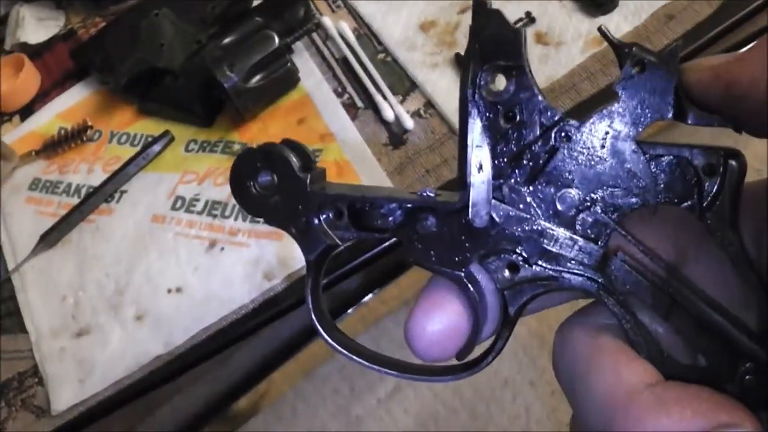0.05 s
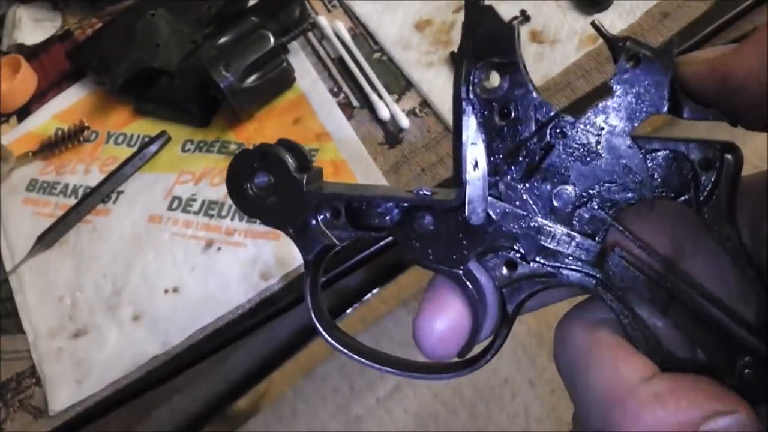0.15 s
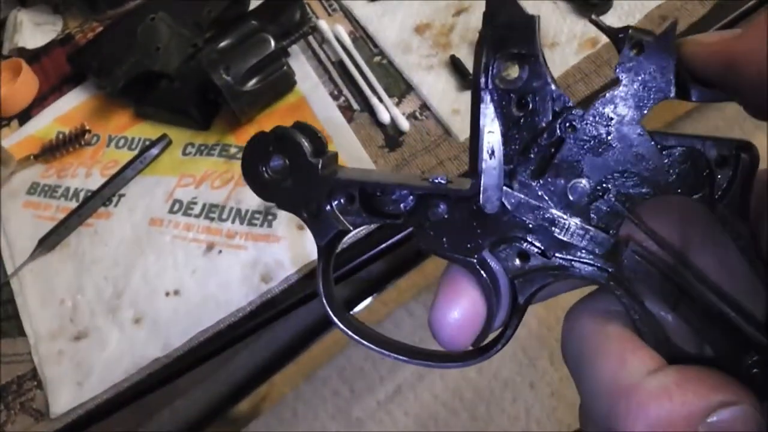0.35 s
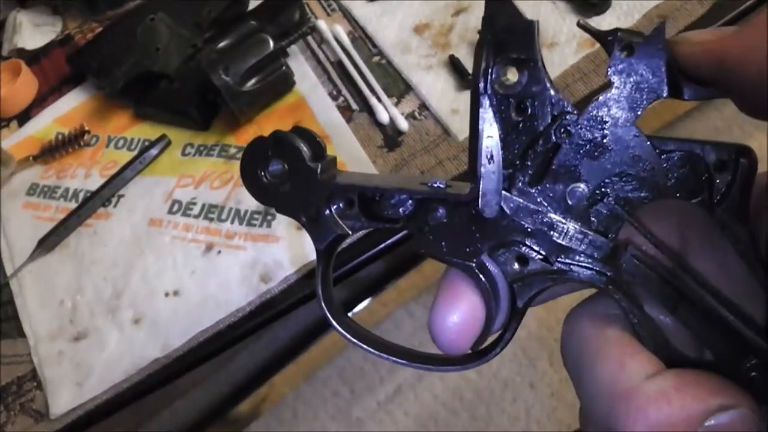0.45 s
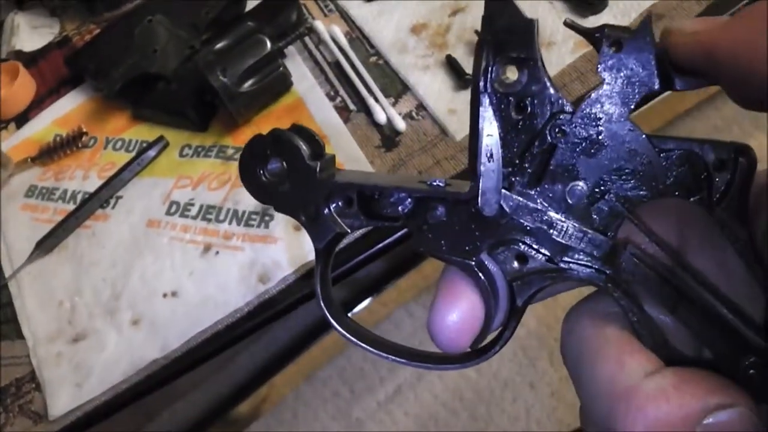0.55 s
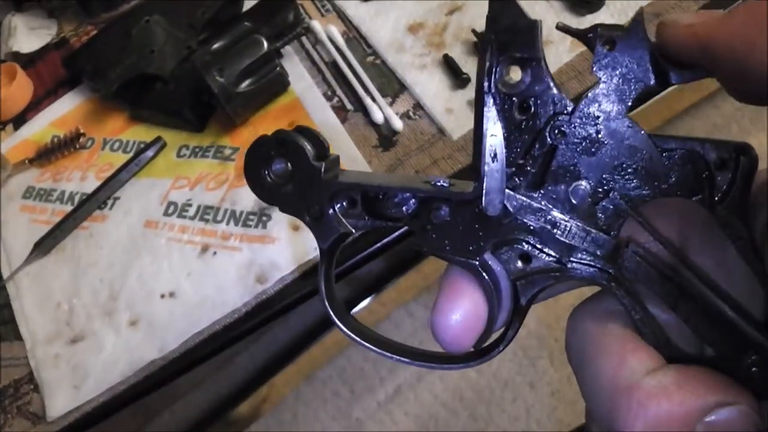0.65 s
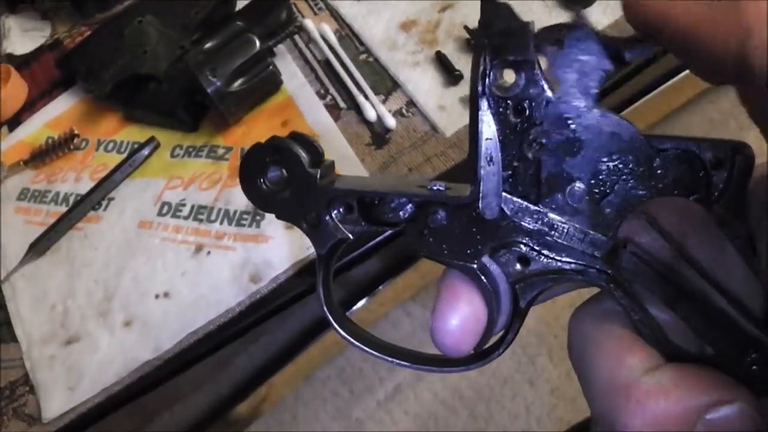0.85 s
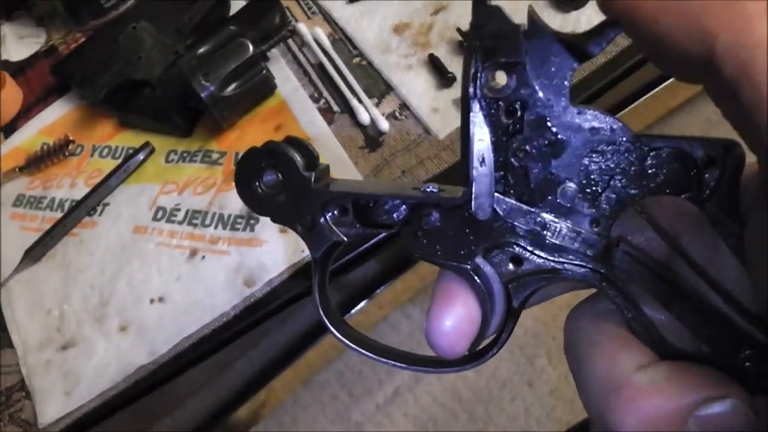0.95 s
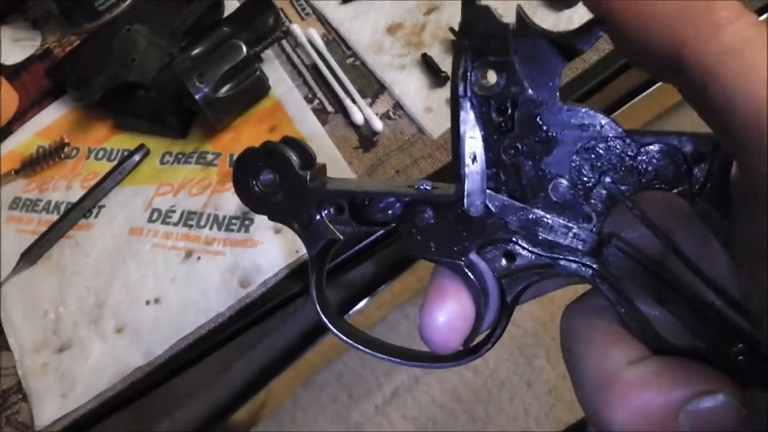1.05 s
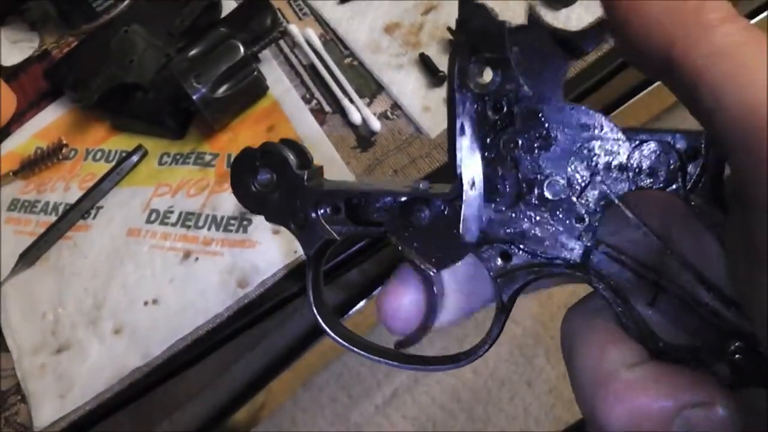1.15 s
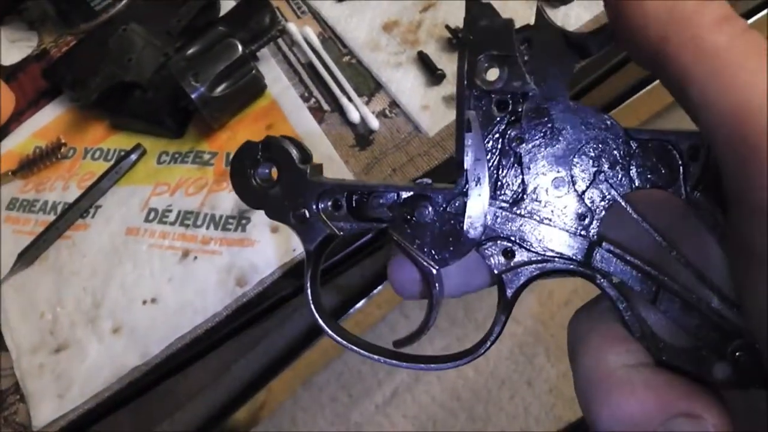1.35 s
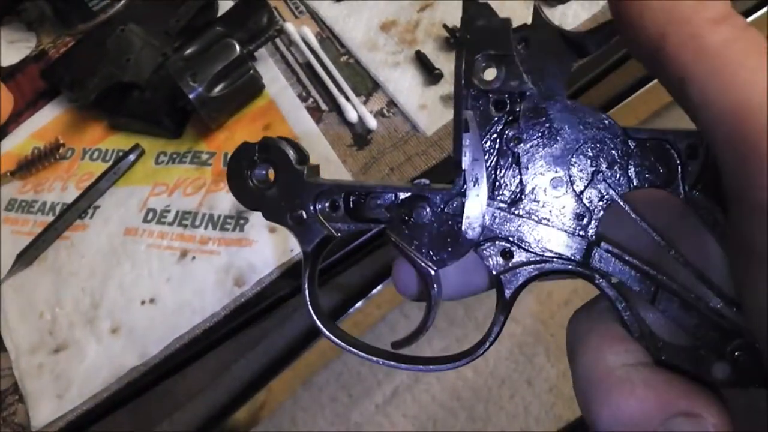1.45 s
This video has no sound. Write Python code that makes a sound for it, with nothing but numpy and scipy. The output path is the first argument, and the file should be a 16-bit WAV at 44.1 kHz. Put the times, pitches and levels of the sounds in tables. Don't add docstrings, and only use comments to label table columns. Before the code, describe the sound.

An open revolver mechanism is worked by hand: a bright cocking click with a low thump, faint trigger ticks, a harder bouncing hammer snap, then a reset click. Close microphone in a small, hissy room.

```python
import sys
import numpy as np
from scipy import signal
from scipy.fft import rfft, irfft, next_fast_len
from scipy.io import wavfile

SR = 44100
rng = np.random.default_rng(int(sys.argv[2]) if len(sys.argv) > 2 else 0)


def makeup_ratio(level_db):
    decades = np.asarray(level_db, float) / 20
    return 10 ** decades


def dump_mix(stems):
    frames = np.atleast_2d(stems).T
    limited = np.clip(frames, -1, 1)
    pcm = np.round(limited * 32767).astype(np.int16)
    wavfile.write(sys.argv[1], SR, pcm)


N = 66150


def unit(x):
    return x / np.sqrt(np.mean(x ** 2) + 1e-20)


def along(points, hz):
    f, v = np.transpose(points)
    return np.interp(np.log(hz + 1), np.log(f + 1), v)


def curve(points):
    return lambda hz: makeup_ratio(along(points, hz))


def filtered(x, response):
    m = next_fast_len(x.shape[-1] + 8192)
    return irfft(rfft(x, m) * response(np.fft.rfftfreq(m, 1 / SR)), m)[..., :x.shape[-1]]


def noise(tone, size, alike):
    def mid_side(hz):
        likeness = alike(hz) if callable(alike) else np.full_like(hz, alike)
        turn = np.arccos(np.clip(likeness, -1, 1)) / 2
        return tone(hz) * np.array([np.cos(turn), np.sin(turn)])

    mid, side = filtered(rng.standard_normal((2, size)), mid_side)
    return unit(np.array([mid + side, mid - side]))


def pan(db):
    return makeup_ratio(np.array([[db / 2], [-db / 2]]))


def add(out, s, x):
    part = out[:, round(s * SR):][:, :x.shape[-1]]
    part += x[..., :part.shape[1]]


def ring(hz, db, t60, seconds, lag=0):
    t = np.arange(round(seconds * SR)) / SR
    decay = makeup_ratio(db - 60 * t / t60)
    return decay * np.sin(2 * np.pi * hz * t + lag) * (1 - np.exp(-4 * t * hz))


def puff(points, t60, alike):
    onset_s = .0001
    t = np.arange(SR // 10) / SR
    return makeup_ratio(-60 * t / t60) * (1 - np.exp(-t / onset_s)) * noise(curve(points), len(t), alike)


def swell(points_or_tone, start, end, first_db, last_db, alike):
    size = max(round((end - start) * SR), 8)
    return makeup_ratio(np.linspace(first_db, last_db, size)) * noise(points_or_tone, size, alike)


# (f/Hz, level/dB)
AIR = [(110, -33), (160, -0.5), (1150, -2), (2100, -10.5), (2600, -25.5), (3500, -27), (3850, -14),
       (6300, -18.5), (15400, -23), (15800, -70)]
# (f/Hz, level/dB)
RUMBLE = [(12, -28), (20, 0.5), (65, -13), (102, -1), (150, -16), (220, -50)]
# (f/Hz, likeness)
ALIKE = [(60, 0.13), (250, -.1), (700, -.45), (3000, -0.66), (4400, 0.75), (8000, 1), (15000, 1)]
# (f/Hz, width/Hz, level/dB)
HUMS = [(98, 18, -57.5), (237, 15, -66.5)]
# (f/Hz, level/dB)
HUM_LINES = [(98.5, -60.5), (1105, -64)]
# (f/Hz, level/dB)
ROOM_PAN = [(80, 3.5), (300, 2.5), (1500, 0.6)]


def room_tone():
    air_db, rumble_db, hum_alike = -49.5, -54, 0.21
    alike = lambda hz: along(ALIKE, hz)
    out = makeup_ratio(air_db) * noise(curve(AIR), N, alike)
    out += makeup_ratio(rumble_db) * noise(curve(RUMBLE), N, alike)
    for centre_hz, width_hz, db in HUMS:
        band = lambda hz: np.exp(-((hz - centre_hz) / width_hz) ** 2)
        out += makeup_ratio(db) * noise(band, N, hum_alike)
    t = np.arange(N) / SR
    for hz, db in HUM_LINES:
        out += makeup_ratio(db) * np.sin(2 * np.pi * hz * t)
    return filtered(out, lambda hz: makeup_ratio(along(ROOM_PAN, hz) * np.array([[.5], [-.5]])))


# (t/s, level/dB)
GAIN = [(0, 2), (.5, -2), (.905, -0.5), (.925, -10), (.947, -16), (0.957, -27.5), (1.2, -25), (1.5, -15)]


def ducked(x):
    return x * makeup_ratio(np.interp(np.arange(N) / SR, *np.transpose(GAIN)))


SMALL_PAN_DB = -4.5
# (t/s, level/dB, f/Hz)
TICKS = [(.0275, -38, 6500), (.2402, -30.5, 9000), (.2565, -40, 9100), (.608, -47, 9470),
         (.6121, -37, 10000), (.62, -37.5, 9870), (.6222, -36, 9350), (.6371, -37, 10500),
         (.648, -37, 11000), (.6505, -41, 11000), (.6548, -41, 10500), (.66, -41, 11000),
         (.6635, -42, 11320), (.683, -45, 11040), (.698, -45, 10400), (1.1632, -41.5, 9430),
         (1.192, -28, 8740), (1.1991, -29, 9230), (1.2105, -33, 9500), (1.2165, -48.5, 8530)]
# (share of its centre f, level/dB)
TICK_TONE = [(.25, -36.5), (.45, -11.5), (.65, -6.5), (.85, 1), (1.15, 7), (1.4, -7.5), (1.6, -28.5)]


def ticks():
    out = np.zeros((2, N))
    for s, db, centre_hz in TICKS:
        tone = [(share * centre_hz, level) for share, level in TICK_TONE]
        add(out, s, makeup_ratio(db) * puff(tone, .0045, 0.77))
    return pan(SMALL_PAN_DB) * out


# (start t/s, end t/s)
SLIDE_S = [
    (.2295, .2316),
    (.605, .64),
    (.64, .71),
    (.917, .9203),
    (.9203, .9222),
    (1.14, 1.178),
    (1.178, 1.192),
    (1.192, 1.206),
]
# (first level/dB, last level/dB, squeak f/Hz)
SLIDES = [(-43.5, -31, 11000), (-65, -66, 11000), (-56, -62, 11000), (-40, -31, 8600), (-25, -25, 10100),
          (-89, -71, 10000), (-54.5, -61, 10000), (-52.5, -40, 10000)]
# (f/Hz, level/dB)
GRIT_TONE = [(300, -18), (2000, -10.5), (3000, -22.5), (5000, -7.5), (9000, -4.5), (13000, -2.5),
             (15500, -7), (16400, -31)]


def slides():
    squeak_db, squeak_width_hz = 2, 950
    out = np.zeros((2, N))
    for (start, end), (first_db, last_db, squeak_hz) in zip(SLIDE_S, SLIDES):
        squeak = lambda hz: makeup_ratio(squeak_db) * np.exp(-((hz - squeak_hz) / squeak_width_hz) ** 2)
        tone = lambda hz: curve(GRIT_TONE)(hz) + squeak(hz)
        add(out, start, swell(tone, start, end, first_db, last_db, 0.28))
    return pan(SMALL_PAN_DB) * out


SNAP_S = [
    .2316,
    .9232,
    1.206,
]
# (steel level/dB, grit level/dB, knock level/dB, echo level/dB)
SNAPS = [
    (-6.5, -29.5, -12, -46),
    (-17, -14.5, -11.5, -24.5),
    (-13.5, -16, -24, -31),
]
# (delay t/s, level/dB)
REBOUNDS = [
    [(0, 0)],
    [(.0001, 0), (.0008, -1), (.0016, -11)],
    [(0, 0), (.0004, -3), (.0013, -10)],
]
# (f/Hz, level/dB, t60/s)
COCK = [(9230, 6, 0.0042), (8530, -9, 0.011), (10950, -11, 0.009), (6580, -18, 0.0087),
        (5130, -12.5, 0.008), (4345, -19.5, 0.0084), (12900, -16, .008), (14400, -25, .008)]
DROP = [(8560, 2.5, 0.011), (9750, 0, 0.01), (11180, -1.5, 0.012), (10380, -2.5, .009),
        (12200, -15.5, 0.0085), (13200, -13.5, 0.0057), (14500, -8, 0.004), (6610, -17, 0.0048),
        (4330, -6.5, 0.0066)]
RESET = [(8300, -4.5, 0.0098), (9470, 5, .009), (11000, -2, 0.0069), (11800, -5, 0.015),
         (13900, -7.5, .008), (5400, -13.5, 0.0039), (4370, -9, 0.0088), (6900, -10, .008)]


def steel_snaps():
    steel_pan_db, grit_t60 = -4.5, .01
    out = np.zeros((2, N))
    for s, (steel_db, grit_db, _, _), rebounds, steel in zip(SNAP_S, SNAPS, REBOUNDS, (COCK, DROP, RESET)):
        for delay, loss_db in rebounds:
            modes = np.zeros((2, round(.1 * SR)))
            for hz, db, t60 in steel:
                modes += np.array([ring(hz, db, t60, .1, lag) for lag in rng.normal(0, .5, 2)])
            blow = makeup_ratio(steel_db) * modes + makeup_ratio(grit_db) * puff(GRIT_TONE, grit_t60, 0.28)
            add(out, s + delay, pan(steel_pan_db) * makeup_ratio(loss_db) * blow)
    return out


# (f/Hz, mid level/dB, side level/dB, t60/s)
FRAME_COCK = [(300, -7.5, -17.5, 0.021), (817, -8.5, -15, 0.01), (1000, 3, -18.5, 0.0073),
              (1250, -1.5, -23, 0.0096), (1720, 1.5, -21.5, 0.0043), (2050, -19.5, -24, .008)]
FRAME_DROP = [(343, -5.5, -1.5, 0.0098), (810, 2, 0, 0.0062), (1406, -8, -7.5, 0.0093),
              (2056, -15, -17, 0.0055)]
FRAME_RESET = [(700, -3, -13, 0.0055), (1390, -19, -33, .06), (1800, -6.5, -26, 0.01),
               (2200, -20.5, -30, 0.05)]


def frame_knocks():
    out = np.zeros((2, N))
    frames = (FRAME_COCK, FRAME_DROP, FRAME_RESET)
    for s, (_, _, knock_db, _), frame in zip(SNAP_S, SNAPS, frames):
        for hz, mid_db, side_db, t60 in frame:
            sides = makeup_ratio(mid_db) + makeup_ratio(side_db) * np.array([[1], [-1]])
            add(out, s, sides * ring(hz, knock_db, t60, .2, np.pi / 3))
    return out


# (level/dB, t60/s)
SPRING = [
    (-41.5, 1.06),
    (-54, 4.4),
    (-55, 5.6),
]


def spring():
    spring_hz, spring_pan_db = 7264, -2
    out = np.zeros((2, N))
    stops = SNAP_S[1:] + [N / SR]
    for s, stop, (db, t60) in zip(SNAP_S, stops, SPRING):
        add(out, s, pan(spring_pan_db) * ring(spring_hz, db, t60, stop - s))
    return out


KNOCK_S = [
    .2337,
    .9213,
]
# (level/dB, f/Hz, t60/s)
KNOCKS = [
    (-12.5, 84, 0.032),
    (-24.5, 630, 0.0057),
]


def thumps():
    out = np.zeros((2, N))
    for s, (db, hz, t60) in zip(KNOCK_S, KNOCKS):
        add(out, s, ring(hz, db, t60, .1, np.pi / 6))
    return out


# (f/Hz, t60/s)
ECHO = [(200, .06), (1000, 0.16), (4000, 0.35), (9000, 0.45), (15000, 0.28)]
# (f/Hz, level/dB)
ECHO_TONE = [(100, -30), (1000, 0), (3000, -10), (6000, -3), (10000, -3.5), (15200, -12), (16000, -41)]


def echoes():
    out = np.zeros((2, N))
    for s, (_, _, _, echo_db) in zip(SNAP_S, SNAPS):
        hz, t, bands = signal.stft(noise(curve(ECHO_TONE), SR // 2, .5), SR, nperseg=256)
        decay = makeup_ratio(-60 * t / along(ECHO, hz)[:, None])
        add(out, s + .003, makeup_ratio(echo_db) * signal.istft(bands * decay, SR, nperseg=256)[1])
    return out


# (start t/s, end t/s, first level/dB, last level/dB, unused f/Hz)
RATTLE = (.927, .950, -39, -46, 5500)
# (f/Hz, level/dB)
RATTLE_TONE = [(120, -27.5), (350, 3), (1200, 1), (3000, -15.5), (5000, -5), (10000, 0), (15500, -0.5),
               (16200, -39)]


def rattle():
    out = np.zeros((2, N))
    start, end, first_db, last_db, _ = RATTLE
    add(out, start, swell(curve(RATTLE_TONE), start, end, first_db, last_db, 0.3))
    return pan(SMALL_PAN_DB) * out


# (level/dB, time constant t/s)
PUSH = (-20.5, 0.00025)


def shove():
    out = np.zeros((2, N))
    db, tau = PUSH
    t = np.arange(SR // 100) / SR
    add(out, SNAP_S[-1], -makeup_ratio(db) * np.e * t / tau * np.exp(-t / tau))
    return out


def scene():
    room = ducked(room_tone() + echoes())
    small_parts = ticks() + slides() + rattle()
    blows = steel_snaps() + frame_knocks() + spring() + thumps() + shove()
    return room + small_parts + blows


def band_limit(x):
    return signal.sosfilt(signal.butter(12, 16990, fs=SR, output="sos"), x)


def record(dry):
    top_hz, top_width_hz = 16400, 200
    mix = filtered(dry, lambda hz: .5 - .5 * np.tanh((hz - top_hz) / top_width_hz))
    return band_limit(mix)


dry = scene()
out = record(dry)
dump_mix(out)
```